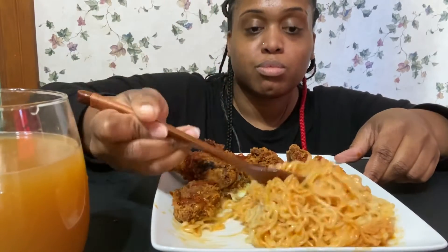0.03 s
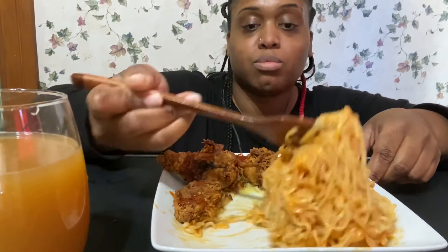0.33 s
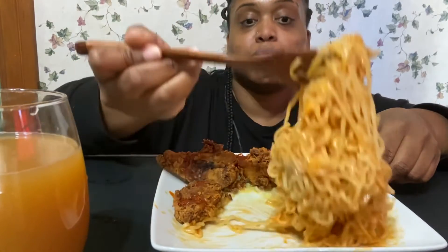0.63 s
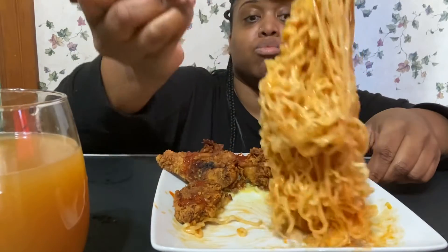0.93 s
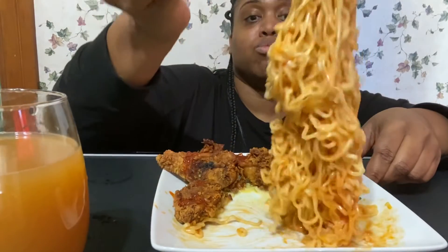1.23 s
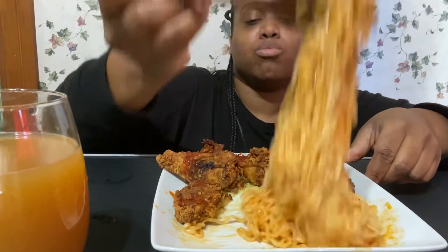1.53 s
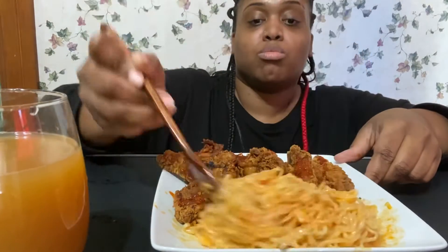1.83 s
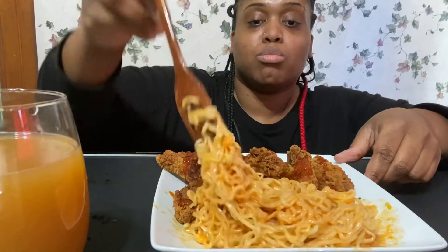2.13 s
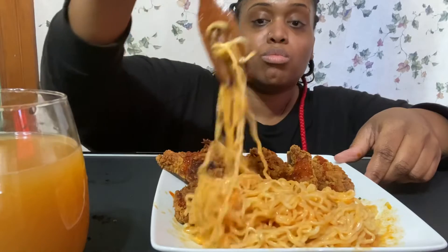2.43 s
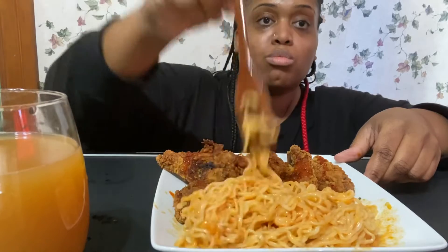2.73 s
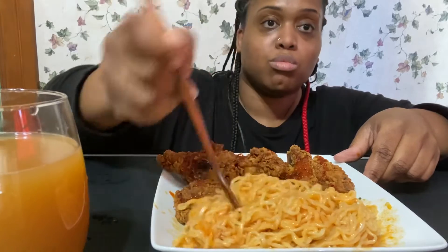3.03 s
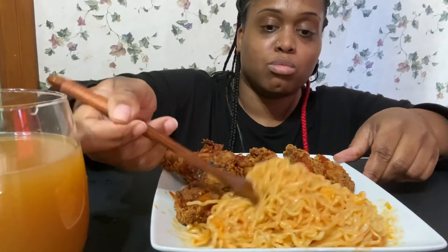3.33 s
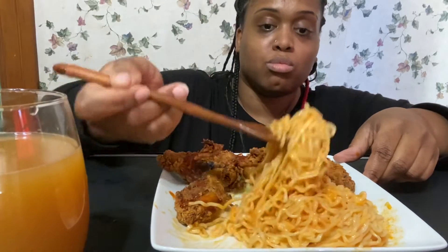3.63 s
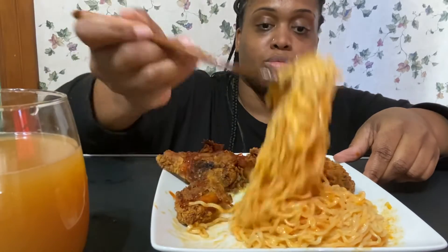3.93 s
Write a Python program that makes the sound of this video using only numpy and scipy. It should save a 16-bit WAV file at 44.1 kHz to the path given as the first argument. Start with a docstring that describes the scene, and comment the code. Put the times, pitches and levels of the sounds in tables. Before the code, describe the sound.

Saucy noodles crackle and pop softly as a wooden fork lifts them, lets them slump, then digs in again with squelches and light plate taps. Close microphones also catch a steady appliance hum in the small room.

```python
"""Forking saucy noodles

A wooden fork lifts noodles from a plate, lets them slump back, digs in and lifts again. Sauce films
snap between the strands as a fine wet crackle with a few clear pops; the fork squelches and taps the
plate. Two closely spaced microphones stand near the plate, which sits slightly to their right.
An appliance hums in the small room."""
import sys
import numpy as np
from scipy import signal
from scipy.fft import rfft, irfft, next_fast_len
from scipy.io import wavfile
from scipy.ndimage import map_coordinates

SR = 44100
rng = np.random.default_rng(int(sys.argv[2]) if len(sys.argv) > 2 else 0)


def digitize_waveform(pressure):
    """Quantize a signal to 16-bit integers and store it at the path in sys.argv[1].

    Rows of a 2-D input are taken as channels; values are limited to [-1, 1].
    """
    field = np.atleast_2d(pressure).T
    bounded = np.clip(field, -1, 1)
    quanta = np.round(bounded * 32767).astype(np.int16)
    wavfile.write(sys.argv[1], SR, quanta)


N = 176400

LAG_S = 0.0001618  # the left microphone hears the plate this much later
PAN_SCATTER_DB = 3  # left-right scatter from burst to burst


def amp(db):
    """Decibels to gain."""
    return 10 ** (np.asarray(db) / 20)


def unit(x):
    """Scaled to rms 1."""
    return x / np.sqrt(np.mean(x ** 2) + 1e-20)


def along(rows, hz):
    """Each column of a table read on a log frequency axis."""
    row_hz, *columns = np.transpose(rows)
    return [np.interp(np.log(hz + 1), np.log(row_hz + 1), column) for column in columns]


def filtered(x, response):
    """x through a complex frequency response."""
    size = next_fast_len(N + SR // 2)
    return irfft(rfft(x, size) * response(np.fft.rfftfreq(size, 1 / SR)), size)[..., :N]


def wobble(rate):
    """A smooth random curve, rate knots a second."""
    return map_coordinates(rng.standard_normal(int(N * rate / SR) + 4), [np.arange(N) * rate / SR])


def swell(middle_s, half_s):
    """A bell-shaped rise and fall."""
    return np.exp(-.5 * ((np.arange(N) / SR - middle_s) / half_s) ** 2)


def sides(difference):
    """Half of a left-right difference for each microphone."""
    return np.array([difference, -difference]) / 2


def bursts(peak_s, db, hz, pan_db, lag_s, rise_s, size=384):
    """Tiny damped tones at both microphones; each swells in rise_s and dies a few times slower."""
    samples = np.round((peak_s - rise_s) * SR).astype(int)[:, None] + np.arange(size) - 8
    phase = rng.random((len(peak_s), 1))
    out = []
    for side_db, late_s in zip(sides(pan_db), sides(lag_s)):
        t = samples / SR - (peak_s + late_s)[:, None]
        age = np.maximum(1 + t / rise_s[:, None], 0)
        envelope = amp(db + side_db)[:, None] * age * np.exp(1 - age)
        wave = envelope * np.sin(2 * np.pi * (hz[:, None] * t + phase))
        out.append(np.bincount(np.clip(samples, 0, N).ravel(), wave.ravel(), N + 1)[:N])
    return np.array(out)


def grains(per_s, hz, spread, cycles, scatter_db, lag_s=0, lag_scatter_s=LAG_S / 2, size=160):
    """A steady stream of random bursts from all over the heap, rms 1."""
    count = int(per_s * N / SR)
    when, strength = rng.random((count, 2)).T
    detune, pan, stretch, place = rng.standard_normal((count, 4)).T
    pitch = np.minimum(hz * np.exp(spread * detune), SR / 3)
    db = scatter_db * np.minimum(-np.log(1 - strength), np.log(50))  # many weak, a few strong
    rise_s = cycles / pitch * np.exp(stretch / 2)
    lags_s = lag_s + lag_scatter_s * place
    return unit(bursts(when * N / SR, db, pitch, PAN_SCATTER_DB * pan, lags_s, rise_s, size))


def appliance(rumble_db=-44, resonance_half_hz=7.1):
    """Slightly unsteady motor tones over a rumble shaped by the room's resonances."""
    # Motor tones. Each row: pitch in Hz, rms level in dB, left over right in dB, left lead in radians.
    motor_tones = [(120.3, -46.5, 0, 0.33), (140.3, -51.5, -4.5, 1.16), (747, -60.5, 2.5, 2.31)]
    # The rumble's spectrum. Each row: frequency in Hz, relative density in dB.
    spectrum = [(31, -28), (43, -11), (55, 1), (70, -9), (95, -3), (130, -0.5), (152, -13.5), (185, -10.5),
                (225, -14), (345, -16.5), (490, -14), (525, -23), (760, -23), (900, -30), (1300, -34),
                (2000, -39), (2500, -48), (3200, -46), (4700, -58.5), (11000, -70.5)]
    # The rumble at the microphone pair.
    # Each row: frequency in Hz, likeness from 0 to 1, left lead in radians, left over right in dB.
    stereo_field = [(60, 0.95, 1.06, -1.5), (192, 0.97, -0.95, -2), (275, 0, 0.4, 2.5),
                    (331, 0.98, 0.7, -8), (358.6, 0.1, -3, -4), (440, 0.59, 2, -9), (523, 0.55, 2, -5.5),
                    (880, 1, 1.82, -4), (1440, 0, 0.97, -3), (4970, 0.4, 4.5, -8.5)]
    # Room resonances that the rumble excites. Each row: frequency in Hz, lift in dB.
    resonances = [(171, 15.2), (292, 8.56), (384, 6.4), (598, 8.7), (709, 10.1), (825, 7.7), (1153, 10.3)]

    def at_microphones(hz):
        likeness, lead, balance_db = along(stereo_field, hz)
        peaks_db = sum(db / (1 + ((hz - centre) / resonance_half_hz) ** 2) for centre, db in resonances)
        gain = amp(along(spectrum, hz)[0] + peaks_db + sides(balance_db)) * np.exp(1j * sides(lead))
        width = np.arccos(np.clip(likeness, 0, 1)) / 2
        return np.array([gain * np.cos(width), gain * sides(2 * np.sin(width))])  # mid and side

    mid_side_noise = rng.standard_normal((2, 1, N))
    out = amp(rumble_db) * unit(filtered(mid_side_noise, at_microphones).sum(0))
    t = np.arange(N) / SR
    for hz, db, pan_db, lead in motor_tones:
        phase = 2 * np.pi * hz * t + 0.15 * wobble(3)
        level_db = db + sides(pan_db)[:, None] + 1.1 * wobble(5.01)
        out += np.sqrt(2) * amp(level_db) * np.sin(phase + sides(lead)[:, None])
    return out


def crackle():
    """Strands peel apart in clumps: sharp ticks, finer fizz and a soft lower smacking."""
    # The crackle follows how fast the strands part. Each row: time in seconds, level in dB.
    parting = [(0, -69), (.13, -62), (.24, -67.5), (.41, -62.5), (.5, -69), (.86, -66.5), (.97, -73),
               (1.42, -72.5), (1.64, -67.5), (1.73, -62), (1.8, -62.5), (1.93, -65.5), (1.98, -74),
               (2.18, -76.5), (2.29, -82.5), (2.785, -91), (2.81, -68), (2.98, -70.5), (3.11, -65.5),
               (3.23, -78), (3.3, -74), (3.34, -62), (3.4, -63), (3.44, -72), (3.56, -77), (3.85, -68.5),
               (3.92, -82)]
    level_db = np.interp(np.arange(N) / SR, *np.transpose(parting)) + 1.5 * wobble(50)
    ticks = grains(per_s=900, hz=7090, spread=0.088, cycles=1.12, scatter_db=3.5,
                   lag_s=LAG_S, lag_scatter_s=18e-6)
    fizz = grains(per_s=750, hz=10800, spread=0.041, cycles=1.3, scatter_db=5,
                  lag_s=LAG_S, lag_scatter_s=9e-6)
    smack = grains(per_s=1600, hz=3470, spread=0.24, cycles=0.52, scatter_db=1.9)
    return amp(level_db) * (amp(-4.5) * ticks + amp(-8) * fizz + amp(-7.5) * smack)


def pops(ring_db=-0.5, ring_rise_cycles=1.29, snap_db=-8, snap_hz=9500):
    """The larger films break one by one: a sharp snap and a brief ring, longer for lower pitches."""
    # Sauce films that burst. Each row: time in seconds, level in dB, pitch in Hz.
    films = [(.0955, -47, 10900), (0.1587, -44, 3730), (0.1942, -40, 7300), (0.3911, -37, 8400),
             (0.6, -41, 8200), (.666, -48, 12000), (0.8536, -43.5, 11000), (0.8637, -44.5, 7240),
             (1.0158, -39, 9700), (1.142, -40.5, 10300), (1.1742, -31.5, 10300), (1.201, -39, 12200),
             (1.251, -41, 12000), (1.5257, -38, 8700), (1.533, -41.5, 10100), (1.5837, -39.5, 7400),
             (1.6519, -36.5, 8600), (1.7087, -33, 10300), (1.725, -39.5, 6700), (1.7314, -36, 7000),
             (1.7544, -37.5, 7100), (1.766, -40, 10500), (1.862, -37.5, 6500), (1.893, -42, 6500),
             (1.9298, -42, 6460), (1.933, -49, 12000), (2.2, -51, 6550), (2.447, -52.5, 10100),
             (2.8016, -32, 6430), (2.831, -40, 7000), (2.9124, -41, 9200), (3.033, -41.5, 7010),
             (3.0789, -40.5, 6170), (3.0925, -42, 6550), (3.1359, -45.5, 5500), (3.689, -39, 7240),
             (3.827, -41, 7500), (3.874, -44.5, 10800)]
    peak_s, db, hz = np.transpose(films)
    pan_db = PAN_SCATTER_DB * rng.uniform(-0.86, 1, len(films))
    lag_s = np.full(len(films), LAG_S)
    snap_pitch = np.full(len(films), snap_hz)
    ring = bursts(peak_s, db + ring_db, hz, pan_db, lag_s, rise_s=ring_rise_cycles / hz)
    snap = bursts(peak_s, db + snap_db, snap_pitch, pan_db, lag_s, rise_s=.5 / snap_pitch)
    return ring + snap


def squelches():
    """Air squeezes out in dense clusters of soft smacks where the fork digs in or the heap lands."""
    # Presses on the heap. Each row: middle in seconds, half length in seconds, level in dB.
    presses = [(0.14, 0.024, -66.5), (0.327, 0.0045, -61), (1.75, 0.014, -69), (1.83, 0.034, -67.5),
               (2.894, 0.028, -67), (3.041, 0.021, -60.5), (3.36, 0.039, -64.5)]
    push = sum(amp(db) * swell(middle_s, half_s) for middle_s, half_s, db in presses)
    return push * grains(per_s=1100, hz=2060, spread=0.46, cycles=0.56, scatter_db=6.0, size=320)


def taps():
    """The wooden fork touches the plate through the noodles and rings it briefly."""
    # Fork contacts. Each row: start in seconds, level in dB.
    contacts = [(0.1323, -47), (0.3194, -54.5), (1.347, -54)]
    # Plate modes, damped by the food. Each row: pitch in Hz, relative level in dB, seconds to fall 60 dB.
    plate_modes = [(325, 8, 0.086), (640, 0, .03), (1310, 0, 0.026), (3090, -6, 0.02)]
    out = np.zeros((2, N))
    for start_s, db in contacts:
        t = np.maximum(np.arange(N) / SR - start_s, 0)[:round(start_s * SR) + SR // 4]
        for hz, mode_db, t60 in plate_modes:
            ring = np.sin(2 * np.pi * (hz * t + rng.random((2, 1)) / 2))
            decay = amp(db + mode_db + rng.standard_normal() - 60 * t / t60)
            attack = 1 - np.exp(-t * hz)
            out[:, :len(t)] += decay * attack * ring
    return out


def slump():
    """Short, dull swells of narrow rumble, as when the heap lands or the plate shifts on the table."""
    # Low thuds. Each row: middle in seconds, level in dB, pitch in Hz.
    thuds = [(.99, -41.5, 171), (1.65, -46, 58.5), (2.19, -46, 57.5), (3.86, -51, 350)]
    out = np.zeros(N)
    for middle_s, db, pitch in thuds:
        rumble = filtered(rng.standard_normal(N), lambda hz: np.exp(-(hz / pitch - 1) ** 2 * 20))
        out += amp(db) * swell(middle_s, half_s=0.043) * unit(rumble)
    return out


def slither(ring_hz=3100, half_width_hz=100):
    """A thin narrow hiss while the hanging strands slide down onto the heap."""
    slips = grains(per_s=2200, hz=ring_hz, spread=0.15, cycles=0.88, scatter_db=3)
    hiss = filtered(slips, lambda hz: 1 / (1 + 1j * (hz - ring_hz) / half_width_hz))
    return amp(-74.5) * swell(middle_s=1.52, half_s=0.16) * unit(hiss)


def room(x, t60=0.21):
    """The small room's short diffuse tail, different at each microphone."""
    t = np.arange(SR // 3) / SR
    early_lift = 1 + 3 * np.exp(-t / 0.0039)
    tail = rng.standard_normal((2, len(t))) * amp(-60 * t / t60) * early_lift
    return signal.fftconvolve(x, tail / np.linalg.norm(tail[0]), axes=1)[:, :N]


def scene():
    """The plate close up, with the room's reflections and the hum behind it."""
    food = crackle() + squelches() + slither() + taps()
    popping = pops()
    reflections = room(amp(-4.5) * food + amp(-11) * popping)  # the pops are close and nearly dry
    return food + popping + reflections + slump() + appliance()


def record(dry, corner_hz=11500, shelf_db=-23, top_hz=15800):
    """The microphones drop steeply to a low shelf in the top treble and pass nothing above top_hz."""
    def response(hz):
        rolloff = 1 / np.sqrt(1 + (hz / corner_hz) ** 44)
        return (hz < top_hz) * np.maximum(rolloff, amp(shelf_db))

    return filtered(dry, response)


dry = scene()
out = record(dry)
digitize_waveform(out)
```